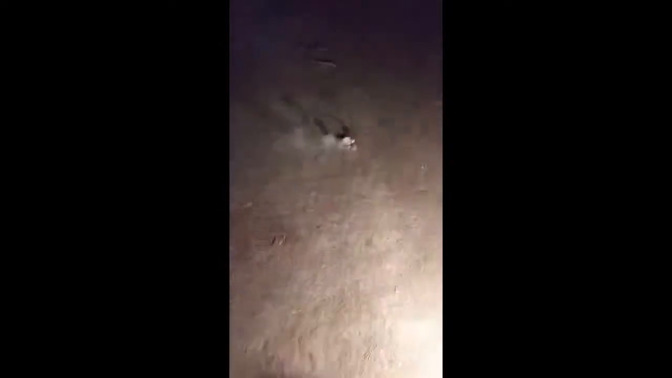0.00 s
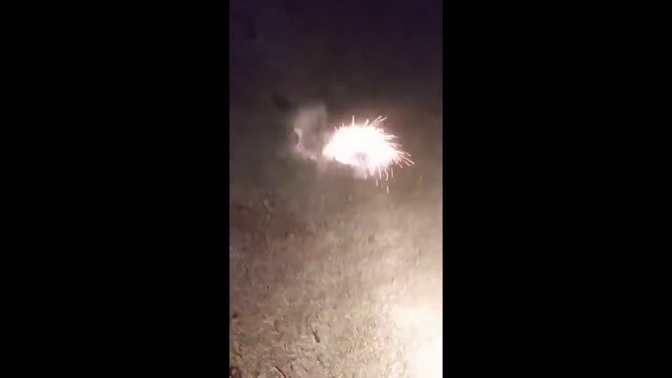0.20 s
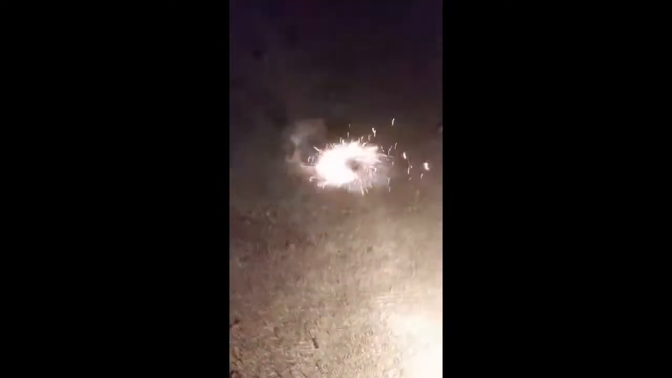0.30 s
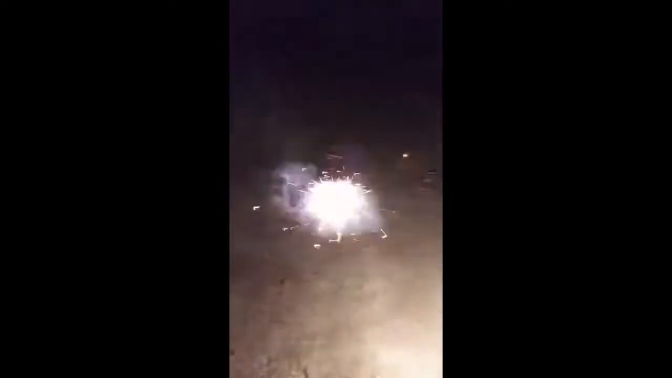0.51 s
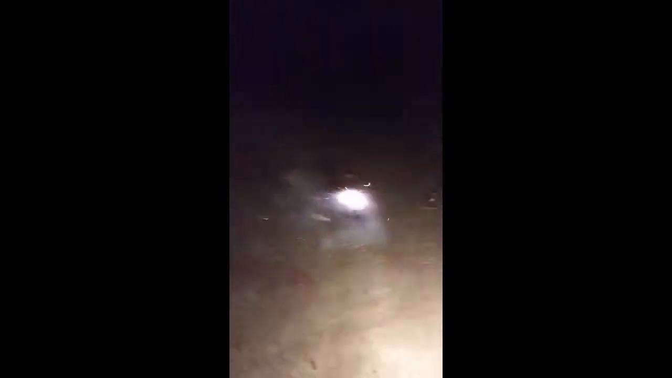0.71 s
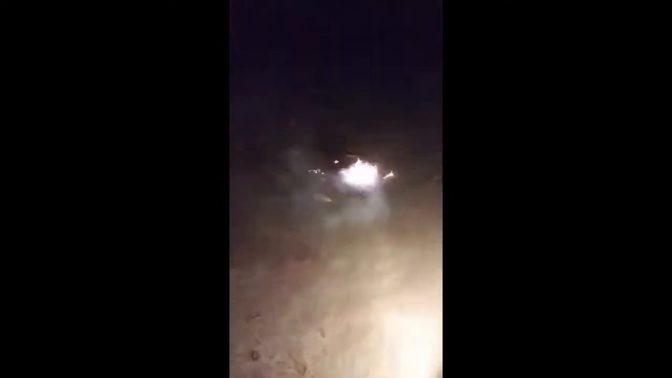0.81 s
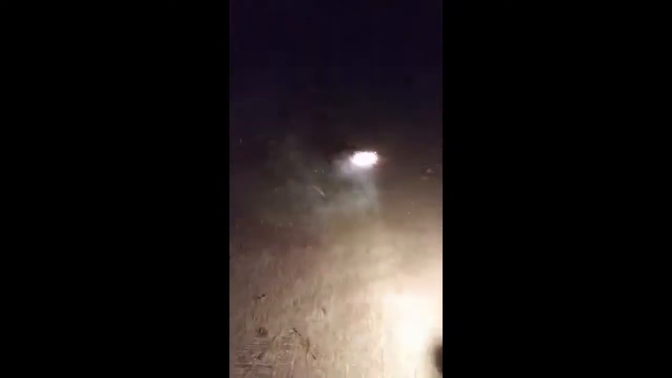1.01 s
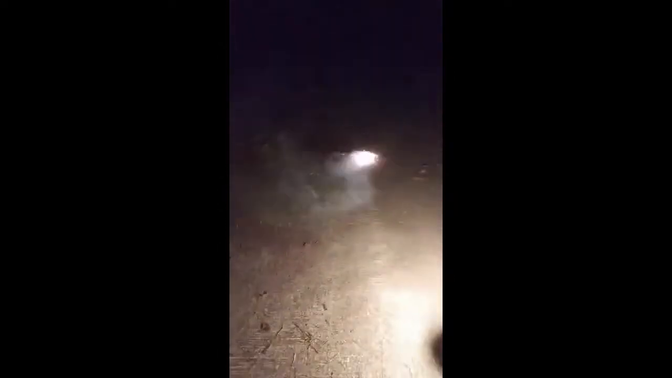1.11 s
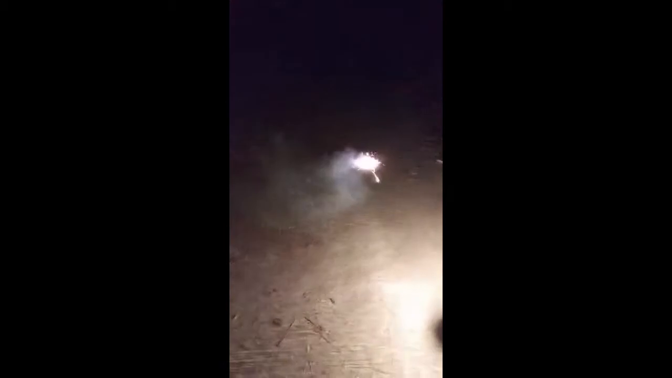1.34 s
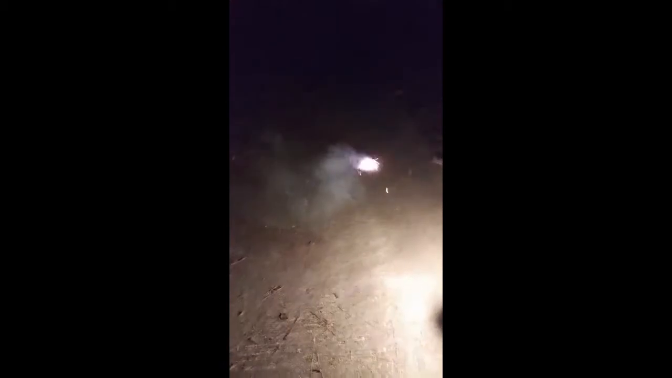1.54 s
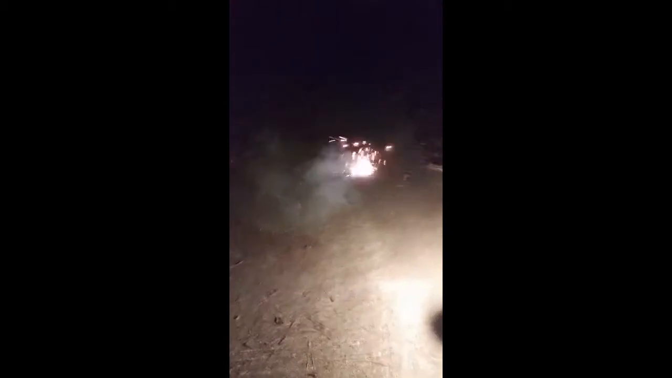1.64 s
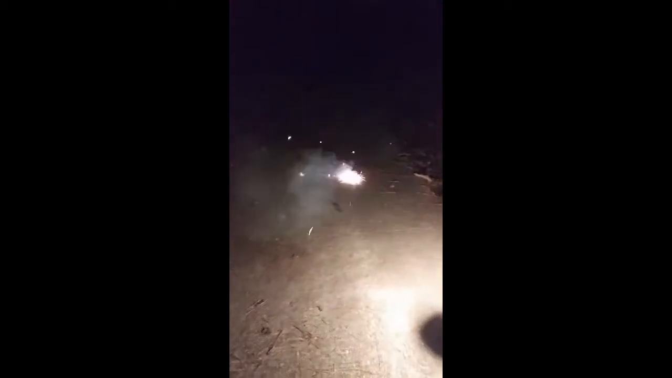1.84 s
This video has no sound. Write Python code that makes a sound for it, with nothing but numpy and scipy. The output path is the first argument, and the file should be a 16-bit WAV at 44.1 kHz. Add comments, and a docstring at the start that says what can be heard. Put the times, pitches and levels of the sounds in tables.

```python
"""A thin hiss spits over dull, distant outdoor air: a small ground spinner firework burns on concrete.
Its jet, noise full of crackling sparks, flares in three surges over a soft falling whoomp, then settles.
The thin hiss that remains flutters with the spin and rings the cardboard tube, modelled as resonances.
A few pops, swelling and dying sines with noise cracks, stand out; a breathy whistle ends the flare.
Faint reflections surround the spinner, and the recorder cuts bass and treble and rounds the peaks."""
import sys
import numpy as np
from scipy import signal
from scipy.fft import rfft, irfft
from scipy.io import wavfile

SR = 44100
rng = np.random.default_rng(int(sys.argv[2]) if len(sys.argv) > 2 else 0)


def unload_wav(signal):
    """Save mono or channel-first audio to the path in sys.argv[1] as 16-bit WAV at rate SR, clipped to [-1, 1]."""
    wavfile.write(
        sys.argv[1],
        SR,
        np.round(np.clip(np.atleast_2d(signal).T, -1, 1) * 32767).astype(np.int16),
    )


N = 83790
TIME = np.arange(N) / SR
# rms of the sparks against the smooth gas: buried in the flare, plainer once it has settled
FLARE_SPARKS_DB, SETTLED_SPARKS_DB = -8.5, -4


def amp(db):
    """Decibels to gain."""
    return 10 ** (np.asarray(db) / 20)


def unit(x):
    """Scales to rms 1."""
    return x / np.sqrt(np.mean(x ** 2) + 1e-20)


def curve(rows, axis=1):
    """One column of a time table, at every sample."""
    columns = np.transpose(rows)
    return np.interp(TIME, columns[0], columns[axis])


def add(mix, s, sound):
    """Mixes a sound in at a time in seconds."""
    part = mix[max(round(s * SR), 0):][:len(sound)]
    part += sound[:len(part)]


def colour(x, points):
    """Causal filter with the shape of a spectrum; keeps the power of white noise."""
    size = 4096
    f, db = np.transpose(points)
    bin_hz = abs(np.fft.fftfreq(size, 1 / SR))
    gain = unit(amp(np.interp(np.log(bin_hz + 1), np.log(f), db)))
    # minimum phase: the response starts at once
    response = np.exp(np.conj(signal.hilbert(np.log(gain))))
    taps = np.fft.ifft(response).real[:size // 2]
    return signal.fftconvolve(x, taps)[:len(x)]


def wander(rate_hz):
    """Smooth random motion of rms 1, fading out above about a rate."""
    f = np.fft.rfftfreq(N, 1 / SR)
    slow = rfft(rng.standard_normal(N)) * np.exp(-(f / rate_hz) ** 2)
    return unit(irfft(slow, N))


def resonate(x, hz, width_hz):
    """A resonance of gain 1 that can follow a curve: shift down, smooth, shift back up."""
    turn = np.exp(2j * np.pi * np.cumsum(hz * np.ones(N)) / SR)
    r = np.exp(-np.pi * abs(width_hz) / SR)
    return 2 * (turn * signal.lfilter([1 - r], [1, -r], x / turn)).real


def resonate_twice(x, hz, width_hz):
    """Two passes, each twice the given width, for steeper skirts."""
    return resonate(resonate(x, hz, 2 * width_hz), hz, 2 * width_hz)


def breathy(rows, width_hz):
    """Noise in one narrow resonance that follows a table of pitch and level."""
    tone = resonate_twice(rng.standard_normal(N), curve(rows), width_hz)
    return unit(tone) * amp(curve(rows, axis=2))


def ping(t, hz, rise_s):
    """A few cycles that swell and die away."""
    swell = t / rise_s * np.exp(1 - t / rise_s)
    return swell * np.sin(2 * np.pi * hz * t)


def background(level_db=-45.5, waver_db=1.0):
    """Dull, distant outdoor noise whose level wavers slightly."""
    # spectrum of the open air: f/Hz, level/dB (per Hz, relative)
    air = [(25, -39), (55, -24), (100, -9.5), (160, -4), (300, -3), (520, 1.5), (900, -3.5), (1200, -9.5),
           (1600, -15.5), (3000, -48), (8000, -39), (16000, -57)]
    return amp(level_db + waver_db * wander(rate_hz=32)) * colour(rng.standard_normal(N), air)


def flutter():
    """The nozzle faces the listener once a turn: a swing in dB."""
    # spin of the firework: t/s, f/Hz (turns per second), level/dB (peak swing)
    spin = [(0, 20, 0.8), (.55, 51, 0.1), (.84, 68, 3), (.93, 51, 1), (1.1, 58, 1), (1.34, 59, 1.5),
            (1.5, 58.9, 1.2), (1.64, 69, 2.5), (1.9, 60, 2.3)]
    return curve(spin, axis=2) * np.sin(2 * np.pi * np.cumsum(curve(spin)) / SR)


def burn(sparks_db, sparks_per_s=1100, spread_db=5):
    """Turbulent gas with tiny sparks of random size bursting in it."""
    sizes = amp(spread_db * np.minimum(rng.exponential(1, N), 3.5))
    bursts = rng.random(N) < sparks_per_s / SR
    sparks = sizes * rng.choice([-1, 1], N) * bursts
    return unit(rng.standard_normal(N) + amp(sparks_db) * unit(sparks))


def shifting(x, size=512):
    """The flame's changing colour: its fizz, a moving hollow and drifting patches."""
    # gain of the fizz, faded in between 8.2 and 10.7 kHz: t/s, level/dB
    fizz_lift = [(0, 2), (.17, 1.5), (.29, 4.5), (.38, -4.5), (.52, 0), (.62, -4), (.72, 2.5), (.9, 2.5),
                 (1.15, -1), (1.45, -1), (1.9, -0.5)]
    # a hollow that sinks as the flame moves over the ground, then edges up: t/s, f/Hz, level/dB (gain)
    hollow_path = [(.2, 3640, -10), (.35, 3550, -10), (.5, 3120, -7), (.75, 3060, -12), (1.4, 3190, -4),
                   (1.9, 3230, -7)]
    hollow_width_hz = 160
    patch_hz, patch_s, patch_db = 130, 0.027, 1.75  # spread in pitch and time, rms gain
    hz, t, z = signal.stft(x, SR, nperseg=size, noverlap=size - size // 4)

    fizz = np.interp(hz, (8200, 10700), (0, 1))[:, None] * np.interp(t, *np.transpose(fizz_lift))

    at, centre_hz, depth_db = np.transpose(hollow_path)
    from_centre_hz = hz[:, None] - np.interp(t, at, centre_hz)
    hollow = np.interp(t, at, depth_db) * np.exp(-(from_centre_hz / hollow_width_hz) ** 2)

    across = np.exp(-((hz[:, None] - hz) / patch_hz) ** 2)
    along = np.exp(-((t[:, None] - t) / patch_s) ** 2)
    patches = patch_db * unit(across @ rng.standard_normal(z.shape) @ along)

    shifted = z * amp(fizz + hollow + patches)
    return signal.istft(shifted, SR, nperseg=size, noverlap=size - size // 4)[1][:N]


def jet(swing_db, sputter_db=0.88):
    """Hiss and roar of the flame, sputtering together and swung round by the spin."""
    # hiss and lower roar, ahead of the colour shifts and the swing: t/s, level/dB
    hiss_level = [(0.0, -56.5), (0.036, -55), (0.062, -57), (0.178, -49.5), (0.206, -30), (0.242, -24),
                  (0.29, -20), (0.332, -29), (0.37, -17.5), (0.422, -25.5), (0.444, -17.5), (0.522, -13),
                  (0.576, -21.5), (0.618, -17.5), (0.676, -32), (0.766, -35.5), (0.846, -46.5),
                  (1.122, -51), (1.184, -39), (1.206, -51.5), (1.428, -40.5), (1.64, -52), (1.708, -42),
                  (1.75, -46), (1.794, -42.5), (1.9, -48)]
    roar_level = [(0, -59), (.16, -61.5), (.21, -37.5), (.3, -27), (.39, -27.5), (.425, -30), (.48, -23.5),
                  (.55, -23), (.63, -24.5), (.665, -28), (.7, -43.5), (.8, -51), (1.08, -57), (1.17, -42),
                  (1.23, -47.5), (1.38, -42.5), (1.42, -36.5), (1.6, -54), (1.82, -43), (1.9, -46)]
    # spectra of the flaring hiss, the settled hiss and the roar: f/Hz, level/dB (per Hz, relative)
    flare_hiss = [(1500, -33), (3300, -17.5), (4400, -5.5), (5300, -4.5), (5800, -7), (6700, 1),
                  (7600, 2.5), (8600, -2.5), (9400, -2), (11000, -13.5), (13200, -24), (16000, -31)]
    settled_hiss = [(1500, -36), (3300, -12), (4100, -11), (4700, -7.5), (5400, -4), (5800, -8.5),
                    (6500, 0.5), (7450, 3), (8600, -3.5), (9500, -6), (11000, -13.5), (13000, -25),
                    (16000, -26)]
    roar_spectrum = [(30, -47), (90, -26.5), (160, -14), (270, -5.5), (450, -7), (900, -1.5), (1350, 2),
                     (1700, 1), (2100, 2.5), (2650, 2.5), (3500, -0.5), (5000, 2), (9000, -30)]
    settled = np.interp(TIME, (0.86, 1.4), (0, 1))  # settles between these seconds
    flare = colour(burn(FLARE_SPARKS_DB), flare_hiss)
    steady = colour(burn(SETTLED_SPARKS_DB), settled_hiss)
    hiss = np.sqrt(1 - settled) * flare + np.sqrt(settled) * steady
    roar = colour(burn(sparks_db=-7.5), roar_spectrum)
    flame = amp(curve(hiss_level)) * hiss + amp(curve(roar_level)) * roar
    return shifting(flame) * amp(swing_db + sputter_db * wander(rate_hz=80))


def tube(swing_db, drift=0.03, swing_share=0.33):
    """The gas stream rings the air in the burnt-out tube; its tuning drifts."""
    # resonances of the tube: f/Hz, width/Hz (half that of each pass), level/dB (relative)
    modes = [(910, 173, 3.5), (1886, 134, -2), (2780, 150, -9), (3520, 220, -13), (4590, 300, -15)]
    # how strongly the tube rings, ahead of the swing: t/s, level/dB
    ring_level = [(0, -66), (.55, -37.5), (.72, -44), (.9, -38.5), (1.07, -46.5), (1.25, -42.5),
                  (1.45, -41), (1.55, -41.5), (1.63, -44), (1.73, -47), (1.82, -43), (1.9, -43.5)]
    gas = burn(SETTLED_SPARKS_DB)
    tuning = 1 + drift * wander(rate_hz=8.9)
    ring = np.zeros(N)
    for hz, width_hz, db in modes:
        ring += amp(db) * unit(resonate_twice(gas, hz * tuning, width_hz))
    return unit(ring) * amp(curve(ring_level) + swing_share * swing_db)


def spits():
    """Short spits of the jet: brief extra puffs of hiss."""
    # each puff: t/s, length/s, level/dB
    puffs = [(0.011, .003, -44), (0.019, .003, -45), (0.029, 0.013, -42.5), (0.447, .002, -22),
             (0.593, .002, -21), (1.151, .004, -39.5), (1.19, .005, -49), (1.315, 0.0071, -38),
             (1.331, .006, -37.5), (1.404, 0.006, -35), (1.417, .008, -40), (1.429, 0.0015, -39),
             (1.467, 0.0037, -37)]
    # their spectrum: f/Hz, level/dB (per Hz, relative)
    puff_spectrum = [(300, -23), (1200, -2.5), (3000, -1.5), (5000, -3), (7800, 5), (10000, -7),
                     (13000, -24), (16000, -36)]
    gate = sum(amp(db) * ((TIME >= s) & (TIME < s + length)) for s, length, db in puffs)
    return colour(gate * rng.standard_normal(N), puff_spectrum)


def throat():
    """A soft whoomp under the flare: a low resonance that sinks as the burning charge hollows out."""
    # its path: t/s, f/Hz, level/dB
    sinking = [(.05, 520, -69), (.2, 460, -56), (.31, 354, -39.5), (.41, 294, -45.5), (.49, 268, -34.5),
               (.58, 221, -60), (.64, 172, -53), (.72, 159, -68), (.9, 160, -89)]
    return breathy(sinking, width_hz=86)


def pops():
    """Pops of the burning charge: a sharp snap with a little crack, and a few cycles of hollow ring."""
    # each pop: t/s, level/dB (body), f/Hz (body), level/dB (snap)
    bursts = [(0.1659, -36, 1800, -31.5), (.8035, -28, 1350, -48), (1.6932, -30, 990, -30),
              (1.7052, -30, 1648, -45), (1.709, -20, 1690, -26), (1.7144, -32, 1610, -33.5),
              (1.7175, -26.5, 1630, -28)]
    # spectrum of the crack: f/Hz, level/dB (per Hz, relative)
    crack_spectrum = [(100, -23), (500, -2), (1200, 0.5), (2800, 2), (4200, -4), (5500, -18), (9000, -14),
                      (12000, -40), (16000, -58)]
    body_rise_s, snap_rise_s, snap_hz = 0.00063, 0.0002, 3900
    crack_s, crack_db = 0.00073, -3.5  # decay time of its power, level against the snap
    rings, cracks, t = np.zeros(N), np.zeros(N), TIME[:SR // 20]
    for s, body_db, body_hz, snap_db in bursts:
        body = amp(body_db) * ping(t, body_hz, body_rise_s)
        snap = amp(snap_db) * ping(t, snap_hz, snap_rise_s)
        add(rings, s, body + snap)
        decay = np.exp(-t / crack_s / 2)
        add(cracks, s, amp(snap_db + crack_db) * decay * rng.standard_normal(len(t)))
    return rings + colour(cracks, crack_spectrum)


def whistle():
    """The nozzle almost sings, brief and breathy, as the flare ends, rising a little in pitch."""
    # its path: t/s, f/Hz, level/dB
    rising = [(.72, 1050, -90), (.8, 1078, -48), (.88, 1136, -41), (.95, 1195, -43.5), (.99, 1200, -53),
              (1.05, 1210, -90)]
    return breathy(rising, width_hz=38)


def outdoors(x, echo_db=-15, t60_s=0.48):
    """Faint scattered reflections from the surroundings: sparse random echoes that die away."""
    t = TIME[:SR // 2]
    scattered = rng.standard_normal(len(t)) * (rng.random(len(t)) < 1 / 20)
    taps = scattered * np.exp(-np.log(1000) * t / t60_s)
    return x + amp(echo_db) * signal.fftconvolve(x, taps / np.linalg.norm(taps))[:N]


def scene():
    """The spinner on the ground, in the open air."""
    swing_db = flutter()
    spinner = jet(swing_db) + tube(swing_db) + spits() + throat() + pops() + whistle()
    return (outdoors(spinner) + background())[None]


def record(dry, low_cut_hz=60, ceiling=0.66, cutoff_hz=15760):
    """The recorder's bass cut, soft overload and band limit."""
    thinned = signal.sosfilt(signal.butter(2, low_cut_hz, "high", fs=SR, output="sos"), dry)
    rounded = thinned / (1 + (thinned / ceiling) ** 8) ** (1 / 8)
    band_limit = signal.firwin(1023, cutoff_hz, window=("kaiser", 9), fs=SR)
    return signal.oaconvolve(rounded, band_limit[None], "same")


dry = scene()
out = record(dry)
unload_wav(out)
```